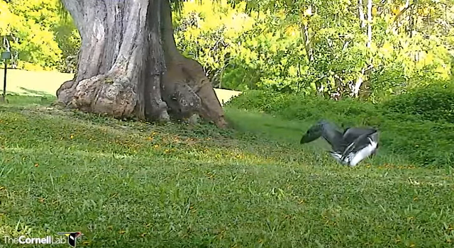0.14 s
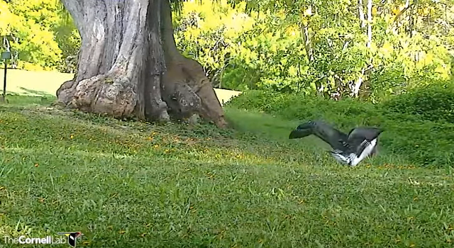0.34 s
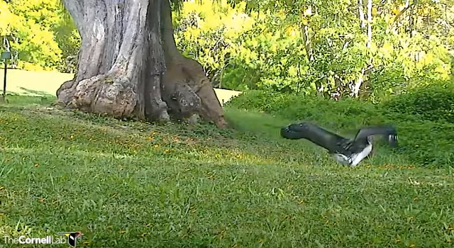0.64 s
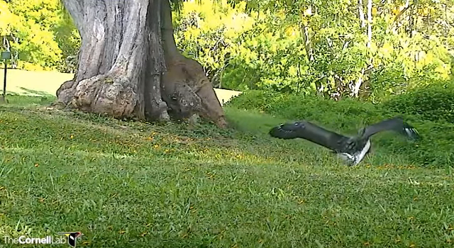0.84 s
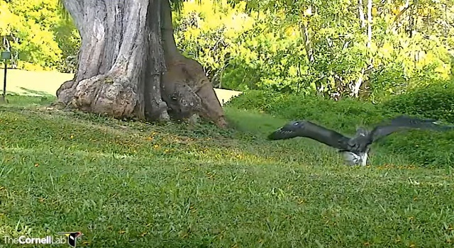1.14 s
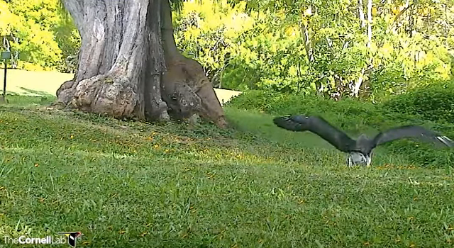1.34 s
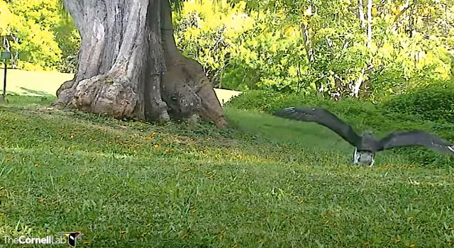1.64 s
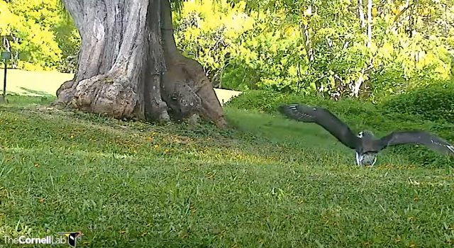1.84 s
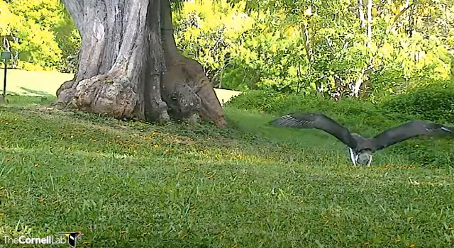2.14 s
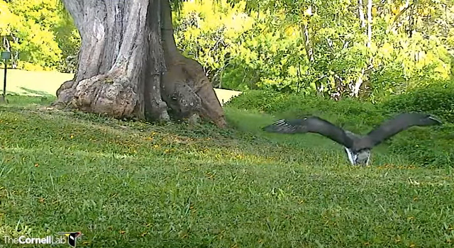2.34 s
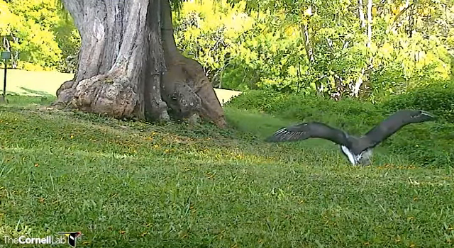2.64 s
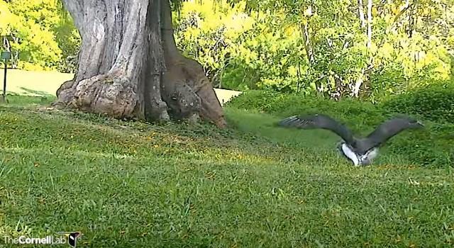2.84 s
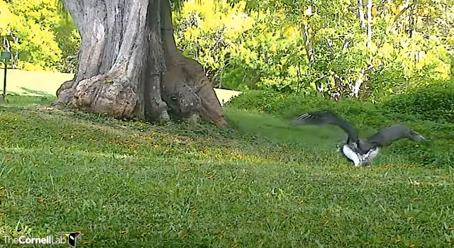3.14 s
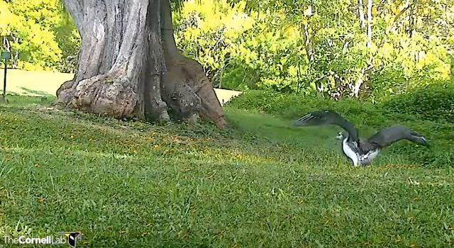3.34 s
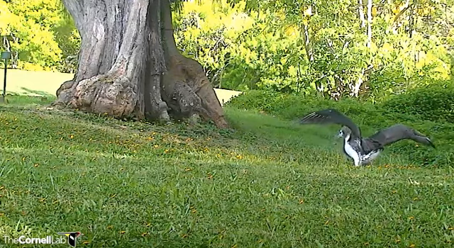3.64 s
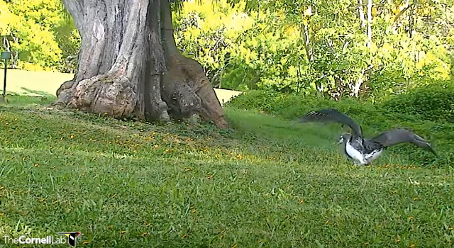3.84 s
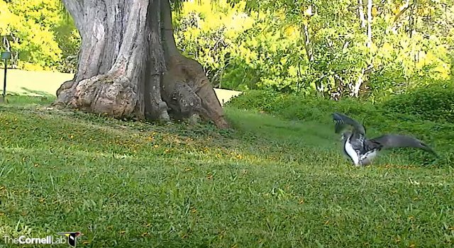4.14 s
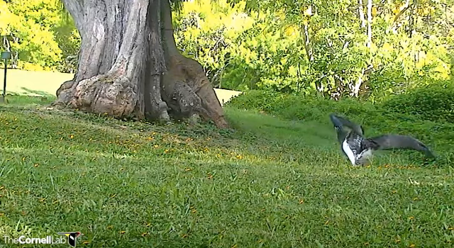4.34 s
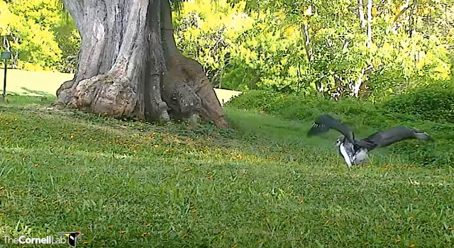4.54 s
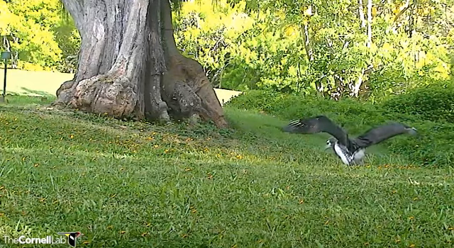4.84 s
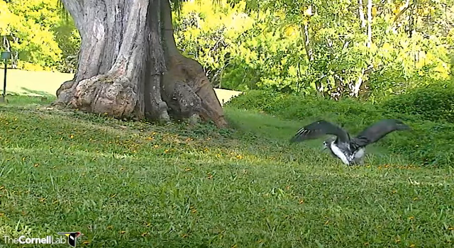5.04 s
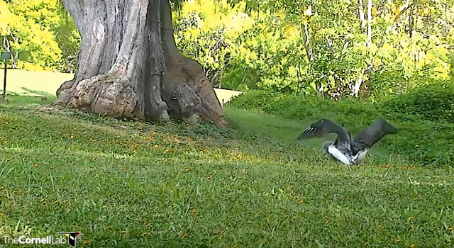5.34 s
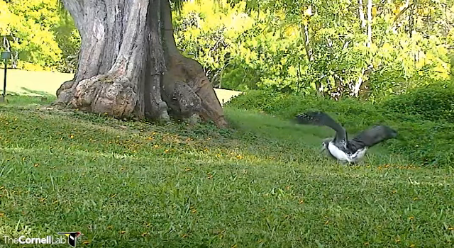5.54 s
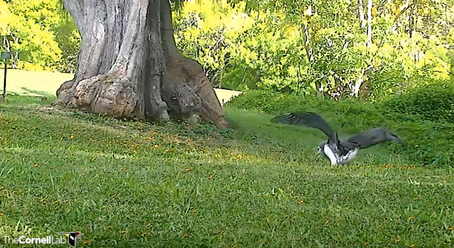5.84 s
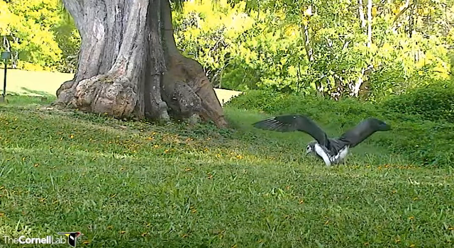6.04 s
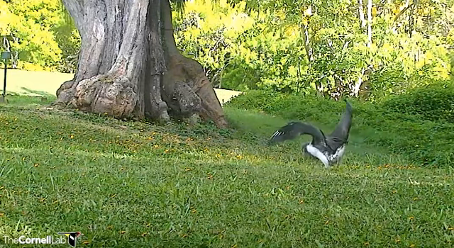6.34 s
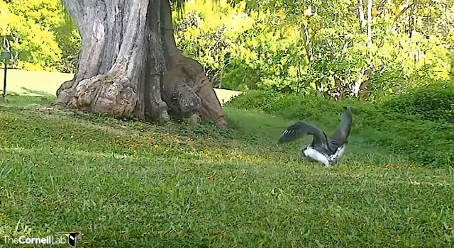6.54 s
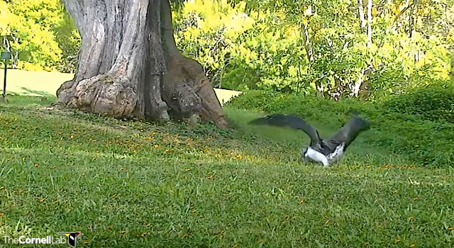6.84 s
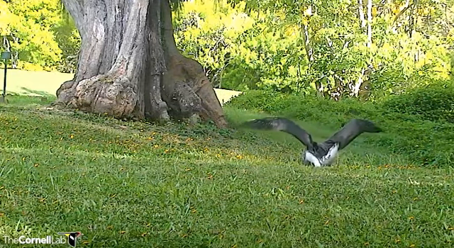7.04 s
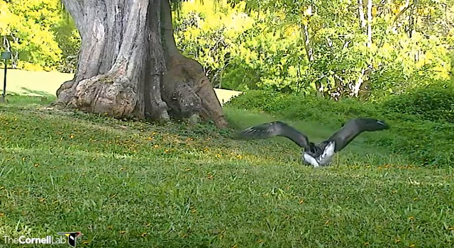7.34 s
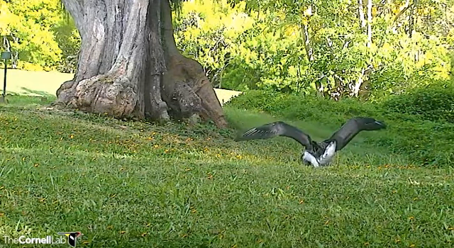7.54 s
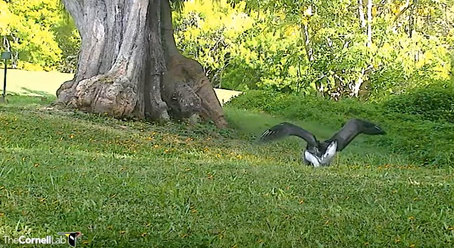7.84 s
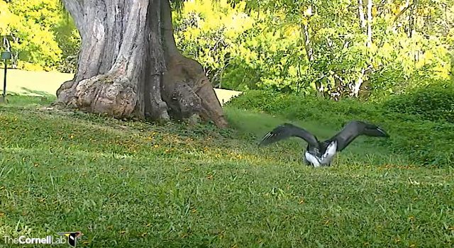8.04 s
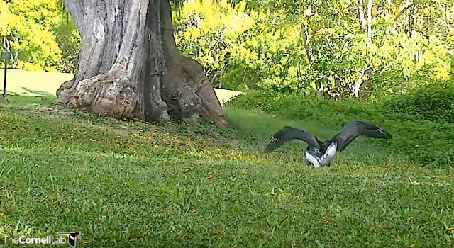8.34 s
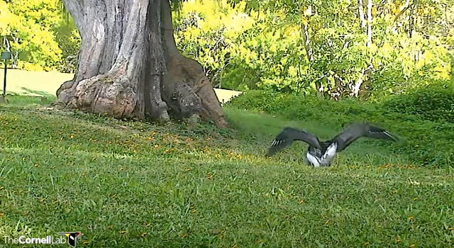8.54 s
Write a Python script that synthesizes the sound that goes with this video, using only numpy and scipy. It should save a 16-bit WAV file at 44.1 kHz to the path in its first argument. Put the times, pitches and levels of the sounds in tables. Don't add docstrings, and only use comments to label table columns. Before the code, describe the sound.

A quiet lawn under trees: airy leaf hiss, a faint hoarse coo early and again late, brief songbird whistles and a flurry of wind bumps midway.

```python
import sys
import numpy as np
from scipy import signal
from scipy.io import wavfile
from scipy.ndimage import uniform_filter1d

SR = 44100
rng = np.random.default_rng(int(sys.argv[2]) if len(sys.argv) > 2 else 0)


def master(y):
    cut = np.clip(np.atleast_2d(y).T, -1, 1)
    pcm = np.round(cut * 32767)
    wavfile.write(sys.argv[1], SR, pcm.astype(np.int16))


def nominal_scale(level):
    x = np.asarray(level, float) / 20
    return 10 ** x


N = 383229

# short_start_s [s], short_peak_db [dB], long_start_s [s], long_peak_db [dB]
DOVE_CALLS = [
    (.128, -59, .45, -60.5),
    (6.562, -56.5, 6.83, -64),
]
# time_s [s], pitch_hz [Hz], level_db [dB]
DOVE_SHORT_NOTE = [
    (0, 738, -20),
    (.026, 754, -7),
    (.052, 800, -12),
    (.078, 860, 0),
    (.098, 835, -5),
    (.113, 785, -10),
    (.138, 765, -22),
]
DOVE_LONG_NOTE = [
    (0, 762, -22),
    (.045, 756, -6),
    (.125, 752, -5),
    (.165, 751, -10),
    (.21, 751, 0),
    (.3, 749, -4),
    (.36, 734, -9),
    (.395, 688, -16),
    (.5, 622, -23),
]
PUFFS_PER_S, REST_HZ, WAVER_HZ = 32, 748, 7
CHOPPED_SHARE, CHOP_SWAY = .34, .22
RASP_HZ, RASP_DB, SHORT_RASP_DB, LOWER_SIDE_DB = 88, -3, -2, -18
RASP_LOSS_DB_PER_HZ = .2

# start_s [s], length_s [s], start_hz [Hz], end_hz [Hz], level_db [dB]
BIRD_WHISTLES = [ (2.487, 0.013, 3350, 3360, -40), (3.073, 0.024, 3336, 3300, -36.5),
                 (3.539, 0.088, 2630, 2610, -56.5), (3.602, 0.0793, 2680, 2580, -59),
                 (3.921, .04, 2900, 3300, -54.5), (4.163, 0.061, 2870, 2910, -47.5),
                 (4.198, 0.059, 3490, 3440, -54), (4.441, .053, 2916, 2925, -54),
                 (4.478, 0.025, 3350, 3450, -51), (5.379, 0.061, 2994, 3070, -45),
                 (5.42, 0.028, 3226, 3370, -41), (5.513, 0.034, 2650, 2640, -45.5),
                 (5.541, .024, 2840, 2630, -42.5), (5.566, .026, 2670, 2750, -42),
                 (5.798, 0.059, 2880, 3000, -48), (5.829, .051, 3040, 2920, -58),
                 (5.91, 0.057, 2570, 2600, -42.5), (5.957, 0.032, 2580, 2626, -39.5),
                 (5.945, 0.02, 2880, 3030, -40), (6.266, .028, 2930, 2980, -50),
                 (6.386, 0.065, 2536, 2525, -42.5), (6.446, 0.025, 2560, 2550, -44), ]
BURR_LEAST, BURR_MOST = .008, .027
BURR_HZ, BURR_SPAN_HZ = 2980, 278

# middle_s [s], half_length_s [s], level_db [dB], centre_hz [Hz]
CHATTER_BOUTS = [(2.529, .12, -54.5, 2800), (2.951, .35, -56.5, 2845), (3.599, .25, -54, 2980),
                 (3.951, .13, -55, 3130), (4.248, .11, -57, 3253), (4.482, .1, -54, 3116),
                 (5.42, .14, -53, 3127), (5.631, .12, -57, 2770), (5.832, .13, -52, 3150),
                 (6.199, .25, -61.5, 3300), (6.5, .13, -56, 2905)]

# start_s [s], peak_db [dB], pitch_hz [Hz]
INSECT_TICKS = [
    (.365, -74, 6400),
    (.562, -73, 6000),
    (1.112, -73, 6550),
    (3.22, -69, 6450),
    (4.355, -77, 6380),
    (4.811, -75, 5990),
    (7.55, -70, 5520),
    (7.857, -75, 6390),
]
CHORUS_DB, CHORUS_SWAY_DB, CHORUS_HZ = -93, 3.5, 6450

# crest_s [s], peak_db [dB], pitch_hz [Hz], swings [count], push [+1 push, -1 pull]
WIND_THUMPS = [ (1.619, -68, 108, 0.86, 1), (4.834, -60.5, 115, 1.4, -1), (4.964, -69, 115, 1.8, 1),
               (5.0099, -40, 105, 1.3, -1), (5.0175, -52.5, 235, 1.25, 1), (5.0205, -45, 145, 1.6, -1),
               (5.034, -49.5, 149, .8, 1), (5.085, -57, 95, 1.8, 1), (5.0955, -50, 147, 0.95, 1),
               (5.11, -61, 120, 2, -1), (5.1522, -44, 106, 0.58, 1), (5.17, -66, 112, 2.6, 1),
               (5.57, -67, 100, 2.5, 1), (5.622, -59.5, 150, .9, 1), (5.638, -47.5, 125, 1.4, 1),
               (5.648, -56, 128.7, 1.6, 1), (6.072, -60.5, 111, 1.2, 1), ]
# crest_s [s], peak_db [dB]
WIND_NUDGES = [(.45, -86), (.62, -81), (.74, -74), (.9, -78), (1.72, -76), (1.92, -78), (2.17, -81),
               (3.4, -85), (5.45, -82), (5.88, -82), (8.35, -80)]
NUDGE_HZ, NUDGE_SWINGS = 69, 1.5
SAG = .08
# freq_hz [Hz], level_db [dB per Hz]
RUMBLE_SPECTRUM = [(15, -34), (30, -17), (60, 5.5), (90, -4.5), (140, -4.5), (250, -29), (500, -52)]
CALM_DB, STIR_DB, STIR_S = -101, -31, .04

# freq_hz [Hz], level_db [dB per Hz]
HISS_SPECTRUM = [(35, -58.5), (140, -30.5), (238, -26), (550, -34.5), (937, -25), (1310, -15),
                 (1720, -25.5), (2160, -7.5), (2930, 3), (4290, -7), (5600, -27), (7000, -40),
                 (11500, -47.5), (16500, -52.5)]
HISS_DB = -50
# freq_hz [Hz], width_hz [Hz], gain_db [dB]
HOUSING_MODES = [(802, 98, 5), (1206, 280, 4), (2183, 130, 4.5), (2930, 580, -1), (3150, 100, -5.5),
                 (3300, 190, 2.5), (4000, 370, -0.5), (4360, 530, 5.5), (6400, 300, 4.5), (7500, 170, -1.5),
                 (8000, 400, 2.5), (8480, 250, -5), (8950, 400, 5), (9300, 160, -6.5), (9730, 350, 6),
                 (10850, 350, 4), (11140, 180, -8), (11200, 40, 5.5), (14800, 300, 4)]
# freq_hz [Hz], level_db [dB rms]
HUM_TONES = [(120.07, -81), (176.6, -102), (232, -99)]


def dove():
    out, unevenness, drift = np.zeros(N), wander(N, 500), wander(N, 350)
    for short_s, short_db, long_s, long_db in DOVE_CALLS:
        notes = (
            (short_s, short_db, DOVE_SHORT_NOTE, RASP_DB + SHORT_RASP_DB),
            (long_s, long_db, DOVE_LONG_NOTE, RASP_DB),
        )
        for start_s, peak_db, shape, rasp_db in notes:
            i = round(start_s * SR)
            add(out, start_s, coo(shape, peak_db, rasp_db, unevenness[i:], drift[i:]))
    return trees(out, t60_s=.25, wet_db=-7)


def coo(shape, peak_db, rest_rasp_db, uneven, drift):
    point_s, pitch_hz, point_db = np.transpose(shape)
    t = np.arange(0, point_s[-1], 1 / SR)
    hz, level_db = np.interp(t, point_s, pitch_hz), np.interp(t, point_s, point_db)
    uneven, drift = uneven[:len(t)], drift[:len(t)]

    tone = phase(hz + WAVER_HZ * uneven[::-1])
    rasp = phase(RASP_HZ * (1 + .4 * drift))
    rasp_db = rest_rasp_db - RASP_LOSS_DB_PER_HZ * abs(hz - REST_HZ)
    upper = nominal_scale(rasp_db + 2 * drift[::-1]) * np.sin(tone + rasp)
    lower = nominal_scale(LOWER_SIDE_DB + 2 * uneven[::-1]) * np.sin(tone - rasp)
    voice = np.sin(tone) + upper + lower

    puff = (.5 - .5 * np.cos(phase(PUFFS_PER_S * (1 + .6 * uneven)))) ** 2
    chopped = np.clip(CHOPPED_SHARE + CHOP_SWAY * drift, 0, .95)
    chopped = chopped * np.clip((hz - 640) / 90, .1, 1)
    swell = 1 - chopped + 2 * chopped * puff
    return np.sqrt(2) * nominal_scale(peak_db + level_db) * swell * voice * signal.windows.tukey(len(t), .1)


def songbird():
    out, unevenness = np.zeros(N), wander(N, 90)
    for start_s, length_s, start_hz, end_hz, level_db in BIRD_WHISTLES:
        t = np.arange(0, length_s, 1 / SR)
        middle_hz = (start_hz + end_hz) / 2
        burr = BURR_LEAST + BURR_MOST * np.exp(-(middle_hz - BURR_HZ) ** 2 / BURR_SPAN_HZ ** 2)
        flutter = np.cos(2 * np.pi * 80 * (t - length_s / 2))
        flutter = flutter + .54 * unevenness[round(start_s * SR):][:len(t)]
        hz = (start_hz + (end_hz - start_hz) * t / length_s) * (1 + .63 * burr * flutter)
        swell = 1 - np.clip(.12 + 17 * burr, 0, .8) * flutter
        tone = np.sin(phase(hz)) * signal.windows.tukey(len(t), .7)
        add(out, start_s, np.sqrt(2) * nominal_scale(level_db) * swell * tone)
    return trees(out, t60_s=.3, wet_db=-11)


def chatter():
    middle_s, half_s, level_db, centre_hz = np.transpose(CHATTER_BOUTS)
    t, power = swells(middle_s, half_s, level_db)
    total = power.sum(axis=1) + 1e-30
    blur = noise(lambda hz: -6 * (hz / 340) ** 2, patchy_db=2)
    carrier = np.cos(phase(along(np.c_[t, power @ centre_hz / total])))
    return np.sqrt(2) * along(np.c_[t, np.sqrt(total)]) * blur * carrier


def insects():
    gain = nominal_scale(CHORUS_DB + CHORUS_SWAY_DB * wander(N, 6000))
    out = gain * noise(lambda hz: -6 * ((hz - CHORUS_HZ) / 170) ** 2, patchy_db=2.5)
    t = np.arange(0, .03, 1 / SR)
    for start_s, peak_db, hz in INSECT_TICKS:
        ring = t / .0056 * np.exp(1 - t / .0053)
        add(out, start_s, nominal_scale(peak_db) * np.sin(2 * np.pi * hz * t) * ring)
    return out


def wind():
    puffs = WIND_THUMPS + [(s, db, NUDGE_HZ, NUDGE_SWINGS, 1) for s, db in WIND_NUDGES]
    crest_s, peak_db = np.transpose(puffs)[:2]
    t, power = swells(crest_s, STIR_S, peak_db + STIR_DB)
    gain = along(np.c_[t, np.sqrt(power.sum(axis=1) + nominal_scale(2 * CALM_DB))])
    out = gain * noise(lambda hz: read(RUMBLE_SPECTRUM, hz), patchy_db=1.8)
    for s, db, hz, swings, push in puffs:
        turns = np.arange(-.06, .06, 1 / SR) * hz
        envelope = np.exp(-2 * (turns / swings) ** 2)
        puff = envelope * np.cos(2 * np.pi * turns * (1 - SAG * turns / swings ** 3))
        puff -= .56 * envelope * puff.sum() / envelope.sum()
        add(out, s - .06, np.sign(push) * nominal_scale(db) * puff)
    return out


def hiss():
    def shape_db(hz):
        modes = sum(db * np.exp(-2 * ((hz - f) / width) ** 2) for f, width, db in HOUSING_MODES)
        return read(HISS_SPECTRUM, hz) + modes
    return nominal_scale(HISS_DB) * noise(shape_db, patchy_db=.6)


def hum():
    t = np.arange(N) / SR
    return sum(np.sqrt(2) * nominal_scale(db) * np.sin(2 * np.pi * hz * t) for hz, db in HUM_TONES)


def trees(x, t60_s, wet_db):
    t = np.arange(SR // 2) / SR
    taps = rng.standard_normal(len(t)) * (rng.random(len(t)) < 1 / 40)
    taps = taps * nominal_scale(-60 * t / t60_s) * (t > .004)
    return x + nominal_scale(wet_db) * signal.fftconvolve(x, taps / np.linalg.norm(taps))[:N]


def noise(shape_db, patchy_db):
    frames, hz = N // 512 + 5, np.fft.rfftfreq(2048, 1 / SR)
    a, b, patches = rng.standard_normal((frames, 1025, 3)).T
    patches = uniform_filter1d(uniform_filter1d(patches, size=24, axis=0), size=8, axis=1)
    z = (a + 1j * b) * nominal_scale(shape_db(hz)[:, None] + patchy_db * evened(patches))
    return evened(signal.istft(z, nperseg=2048, noverlap=1536)[1][:N])


def swells(middle_s, half_s, db):
    t = np.arange(0, N, 64)[:, None] / SR
    return t[:, 0], nominal_scale(2 * np.asarray(db)) * np.exp(-2 * ((t - middle_s) / half_s) ** 2)


def wander(samples, width):
    return evened(uniform_filter1d(uniform_filter1d(rng.standard_normal(samples), width), width))


def evened(x):
    return x / np.sqrt(np.mean(x ** 2) + 1e-20)


def phase(hz):
    return 2 * np.pi * np.cumsum(hz) / SR


def read(points, hz):
    f, value = np.transpose(points)
    return np.interp(np.log(hz + 1), np.log(f + 1), value)


def along(curve):
    return np.interp(np.arange(N) / SR, *np.transpose(curve))


def add(mix, start_s, sound):
    part = mix[round(start_s * SR):][:len(sound)]
    part += sound[:len(part)]


def scene():
    return (dove() + songbird() + chatter() + insects() + wind() + hiss() + hum())[None]


def low_pass(x):
    return signal.sosfilt(signal.butter(12, 15720, fs=SR, output="sos"), x)


def record(dry):
    opened = dry * np.clip(np.arange(N) / 60, 0, 1)
    return low_pass(opened)


dry = scene()
out = record(dry)
master(out)
```